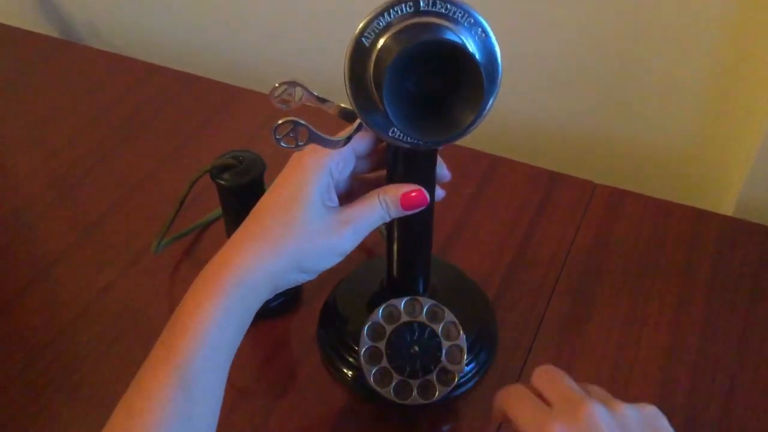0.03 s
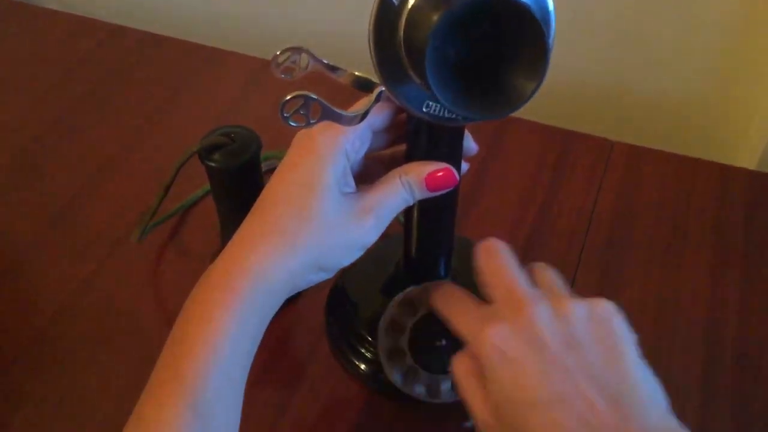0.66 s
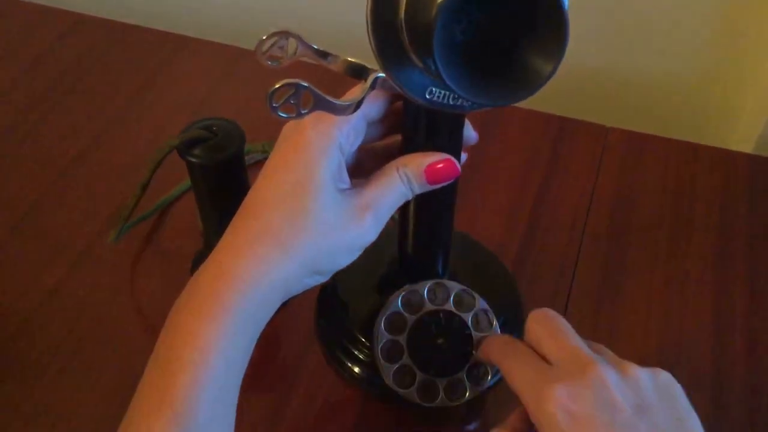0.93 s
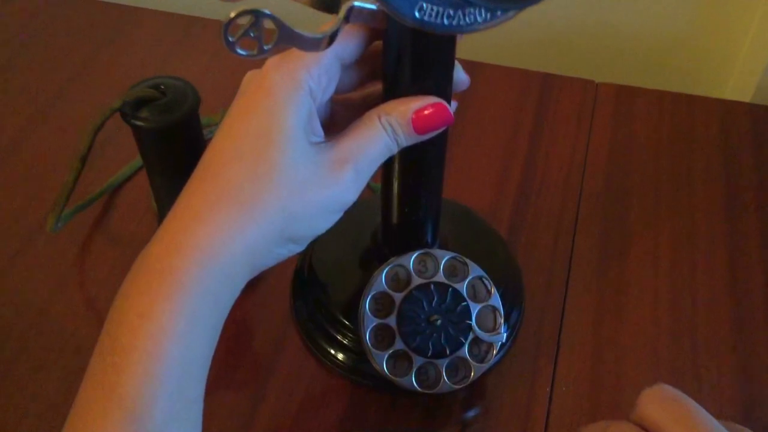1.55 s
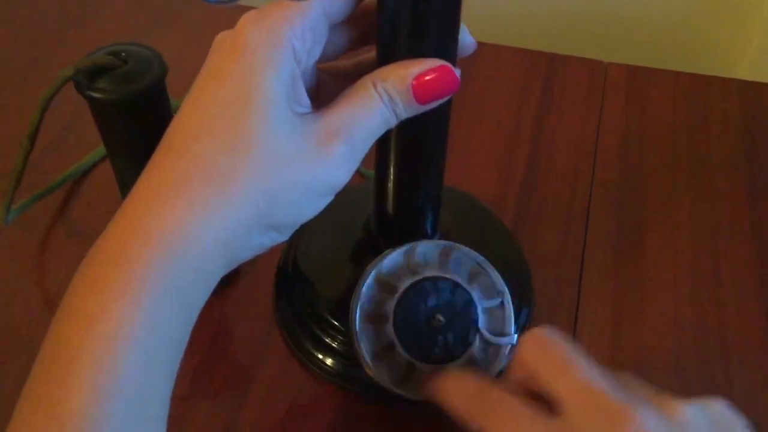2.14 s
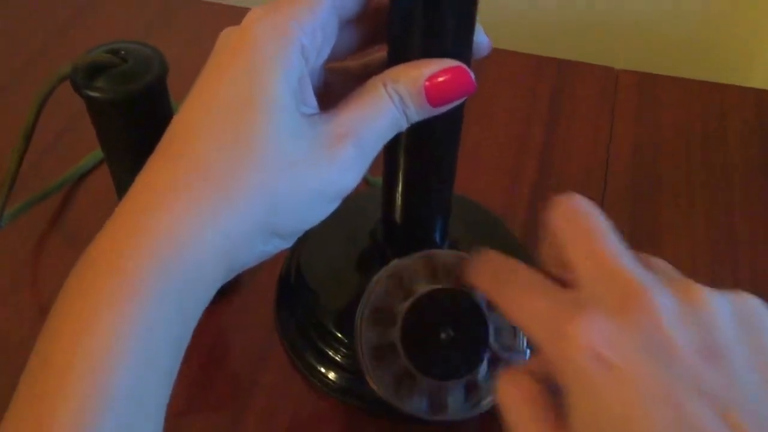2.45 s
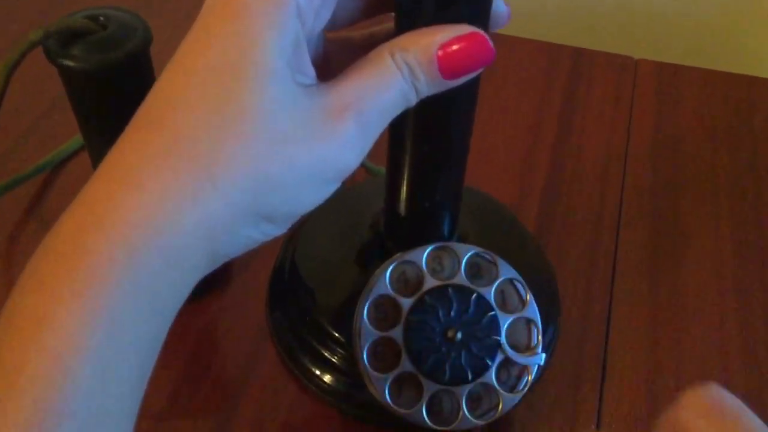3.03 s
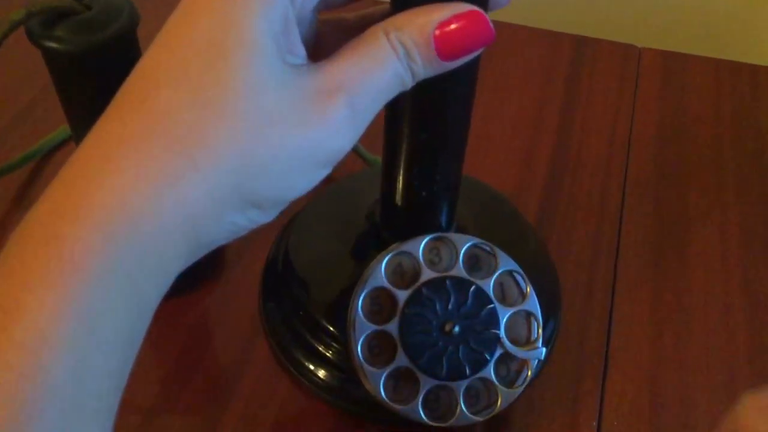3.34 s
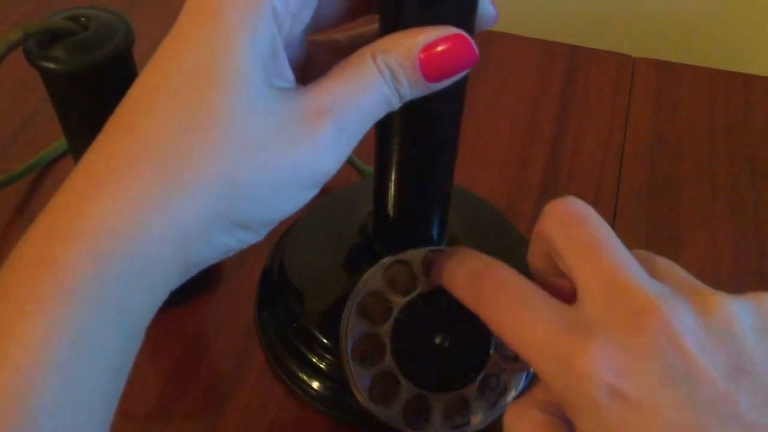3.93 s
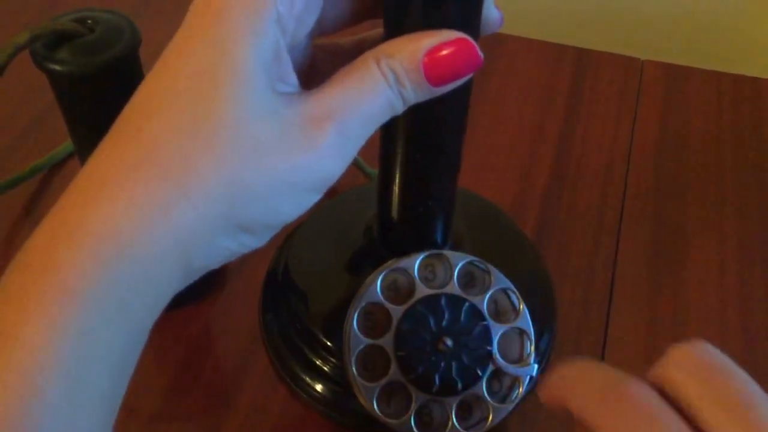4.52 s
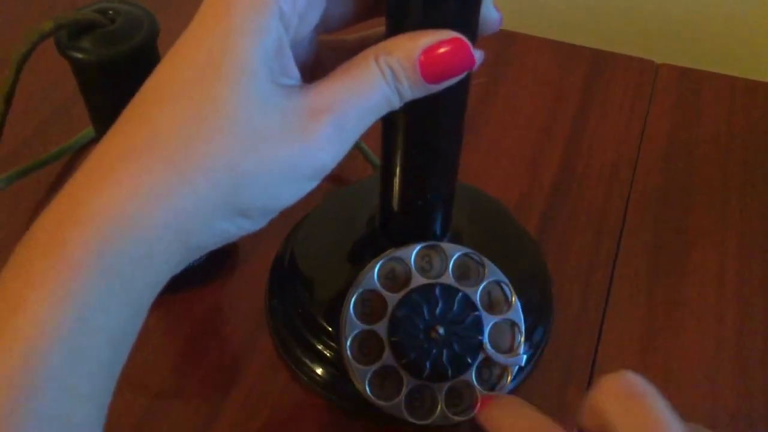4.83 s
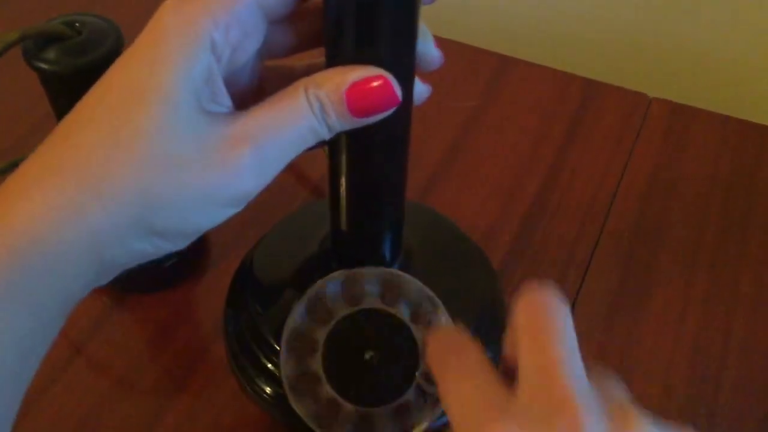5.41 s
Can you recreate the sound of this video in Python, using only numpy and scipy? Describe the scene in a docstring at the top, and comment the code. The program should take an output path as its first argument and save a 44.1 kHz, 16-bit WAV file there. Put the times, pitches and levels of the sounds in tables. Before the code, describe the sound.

A rotary telephone is dialled on a wooden table, heard close up in a small, live room. It opens with the tail of a metallic clunk and a brief, deep handling bump. From 0.5 seconds a finger winds the wheel almost silently, with faint nail ticks, and clicks on the metal stop at 0.9. The wheel whirs back with four even clicks and lands at 1.7 with a sharp clunk that rings the base. A second wind-up clicks at 2.7, and the wheel whirs home with five clicks, clunking at 3.6. The third meets the stop at about 4.3 and returns quickly, with two clicks and a clunk at 4.6. From 5 seconds a last quiet wind-up ends in a bright click at 5.6. A soft, low rumble swells now and then underneath, most between 3 and 5 seconds.

```python
"""A small, live room: a candlestick telephone is dialled on a wooden table, close to one microphone.
Four times a finger winds the wheel almost silently until it clicks on the metal stop. Three times the
wheel runs home under a whirring governor, clicking its pulse contacts, and lands with a clunk that
rings the base. The tail of an earlier landing and a handling bump on the recorder open the scene.
A soft, low rumble swells now and then underneath."""
import sys
import numpy as np
from scipy import signal
from scipy.fft import rfft, irfft, next_fast_len
from scipy.io import wavfile
from scipy.ndimage import map_coordinates

SR = 44100
rng = np.random.default_rng(int(sys.argv[2]) if len(sys.argv) > 2 else 0)


def store_wav(level_fs):
    """Save 16-bit WAV to argv[1]."""
    pcm = np.round(np.clip(np.atleast_2d(level_fs), -1, 1) * 32767)
    wavfile.write(sys.argv[1], SR, pcm.T.astype(np.int16))


N = 250047
TIME = np.arange(N) / SR
RING = np.arange(int(.7 * SR)) / SR  # time since a strike [s]


def amp(db):
    """Decibels to gain."""
    return 10 ** (np.asarray(db) / 20)

def unit(x):
    """Scaled to rms 1."""
    return x / np.sqrt(np.mean(x ** 2) + 1e-20)

def along(points, hz):
    """(frequency, value) points read on a log frequency axis."""
    freqs, values = np.transpose(points)
    return np.interp(np.log(hz + 1), np.log(freqs), values)

def wobble(rate):
    """A smooth random curve, rate knots a second."""
    return map_coordinates(rng.standard_normal(int(N * rate / SR) + 4), [TIME * rate])

def fade(t, t60):
    """Exponential decay, 60 dB in t60 seconds."""
    return np.exp(-np.log(1000) * t / t60)

def ramp(start, length):
    """Rises from 0 to 1 over length seconds."""
    return np.clip((TIME - start) / length, 0, 1)

def held(start, end, attack, release):
    """Attack from start, hold until end, release."""
    return ramp(start, attack) * (1 - ramp(end, release))

def add(track, s, sound):
    """Mix a sound into the track from time s on."""
    start = round(s * SR)
    part = sound[max(-start, 0):N - start]
    track[max(start, 0):][:len(part)] += part

def coloured(x, tone):
    """Causal filter with the given spectrum; white noise keeps its power."""
    size = 2 * next_fast_len(len(x) // 2 + 2048)
    gain = unit(amp(along(tone, np.fft.rfftfreq(size, 1 / SR))))
    cepstrum = irfft(np.log(gain + 1e-6))[:size // 2]
    cepstrum[1:] *= 2  # minimum phase
    return irfft(rfft(x, size) * np.exp(rfft(cepstrum, size)))[:len(x)]

def steady_noise(tone):
    """Noise of rms 1 with the given spectrum."""
    return unit(coloured(rng.standard_normal(N), tone))

def dying_noise(decays):
    """A noise burst of energy 1 in which each frequency dies at its own speed."""
    hz, t, bands = signal.stft(rng.standard_normal(len(RING)), SR, nperseg=128)
    bands = bands * fade(t, along(decays, hz)[:, None])
    burst = signal.istft(bands, SR)[1][:len(RING)]
    return burst / np.linalg.norm(burst)

def resonant(x, modes):
    """What x stirs in a body with the given resonances."""
    size = next_fast_len(len(x) + SR // 8)
    f = np.fft.rfftfreq(size, 1 / SR)
    response = sum(amp(db) * 1j * f * width / (hz * hz - f * f + 1j * f * width)
                   for hz, width, db in modes)
    return irfft(rfft(x, size) * response, size)[:len(x)]

def struck(modes):
    """The ring of one tap; each tap shares its force a little differently among the resonances."""
    t = RING[:len(RING) // 2]
    ring = np.zeros(len(RING))
    for hz, width, db in modes:
        gain = amp(db + rng.normal()) * 2 * np.pi * width / SR
        ring[:len(t)] += gain * np.exp(-np.pi * width * t) * np.sin(2 * np.pi * (hz * t + rng.random()))
    return ring

# reverberation of the small room: (frequency [Hz], t60 [s])
ROOM_DECAY = [(150, 0.43), (500, 0.53), (2500, 0.36), (7000, 0.28), (15000, 0.24)]
def in_room(x, wet_db):
    """The direct sound at the microphone, and the room's answer building up just behind it."""
    tail = dying_noise(ROOM_DECAY) * (1 - fade(RING, 0.081))
    return x + amp(wet_db) * signal.fftconvolve(x, tail)[:len(x)]

# ring of the dial's small metal parts: (frequency [Hz], t60 [s])
METAL_DECAY = [(400, 0.071), (1200, 0.22), (4000, 0.042), (14000, 0.031)]
def blow(tone, crack_t60, rattle_db):
    """A hard contact: a short crack and the dense ring of the small parts."""
    envelope = fade(RING, crack_t60)
    crack = rng.standard_normal(len(RING)) * envelope
    rattle = amp(rattle_db) * dying_noise(METAL_DECAY)
    return np.linalg.norm(envelope) * coloured(crack / np.linalg.norm(crack) + rattle, tone)

# low modes of the base: (frequency [Hz], t60 [s], level on landing [dB], level at the stop [dB])
BASE_MODES = [(69, .5, -19, -31.5), (100.4, 0.4, -7.5, -13), (119.3, 0.38, -8, -2.5),
              (183.4, 0.81, -6, -15), (203, 0.1, -8.5, -2.5), (247.9, 0.27, -5, -10.5),
              (297.2, 0.2, -21.5, -11), (371.5, 0.25, -10, -16.5)]
def thud(landing, rise_s):
    """The base rocks on the table in its low modes."""
    rocking = np.zeros(len(RING))
    for hz, t60, landing_db, stop_db in BASE_MODES:
        gain = amp((landing_db if landing else stop_db) + rng.normal())
        rocking += gain * fade(RING, t60) * np.sin(2 * np.pi * (hz * RING + rng.random()))
    return rocking * (1 - fade(RING, rise_s))

# resonances of the metal base and wheel: (frequency [Hz], width [Hz], relative level [dB])
HOUSING_MODES = [(675, 32, 0), (732.3, 44, -5), (1003, 37, -5.5), (1176, 54, -4.5), (1277, 28, -5),
                 (1421, 42, -5.5), (1921, 66, -7), (2127, 71, -4), (2365, 120, -8), (2747, 45, -12),
                 (3494, 92, -4), (3850, 67, -15), (3974, 110, -10), (4510, 170, -7.5), (5170, 61, -4.5),
                 (5900, 30, -15), (6720, 120, -10.5), (8000, 31, -14.5)]
# spectrum of a landing: (frequency [Hz], relative level [dB])
LANDING_TONE = [(100, -3.5), (300, -8.5), (600, -7.5), (1000, -2.5), (1600, -6.5), (3000, -7), (3700, 2.5),
                (5200, 0.5), (8000, 0), (11000, -5.5), (13000, -1), (15500, -2)]
# the wheel reaches home: (time [s], relative strike level [dB], thud level [dB])
LANDINGS = [(-0.035, -10, -33.5), (1.6993, -3.5, -29.5), (3.5641, -3, -29), (4.5717, -3, -29.5)]
# the spring contacts snap over just before it lands: (time [s], relative level [dB])
SNAPS = [(1.6865, -24.5), (1.6928, -24.5), (1.6953, -13.5), (3.5536, -17), (3.5578, -14.5), (3.5615, -21),
         (4.562, -13.5), (4.567, -21.5)]
def wheel_landings():
    """The contacts snap over, then the wheel strikes home, bounces and shakes the whole telephone."""
    track = np.zeros(N)
    for s, db in SNAPS:
        snap = blow(LANDING_TONE, crack_t60=0.041, rattle_db=-10.5)
        add(track, s, amp(db - 2.5) * in_room(snap, wet_db=-10.5))
    for s, db, thud_db in LANDINGS:
        strike = blow(LANDING_TONE, crack_t60=0.016, rattle_db=-1.5) + amp(34.5) * struck(HOUSING_MODES)
        add(track, s, amp(db - 3.5) * in_room(strike, wet_db=-11.5))
        bounce = blow(LANDING_TONE, crack_t60=0.025, rattle_db=-3)
        add(track, s + 0.0088, amp(db - 19) * bounce)
        add(track, s, amp(thud_db) * thud(landing=True, rise_s=0.051))
    return track

# spectrum of the quiet room: (frequency [Hz], relative level [dB])
ROOM_TONE = [(20, -32), (60, -3.5), (150, -3), (340, -11.5), (450, -26), (700, -21.5), (1300, -24.5),
             (4000, -33.5), (10000, -41.5), (16000, -43.5)]
def room_tone():
    """Faint, low, steady air around the microphone."""
    return amp(-56.5) * steady_noise(ROOM_TONE)

# spectrum of the low rumble: (frequency [Hz], relative level [dB])
LOW_RUMBLE_TONE = [(18, -40.5), (27, -28.5), (40, -5), (55, -1), (70, 3), (88, -13.5), (120, -4.5),
                   (155, -24.5), (185, -14), (300, -27.5), (500, -43.5), (900, -89)]
# the rumble swells: (start [s], end [s], level [dB])
RUMBLE_SWELLS = [(0.428, 0.746, -52.5), (0.878, 1.04, -53), (1.697, 1.96, -52.5), (2.84, 4.833, -47),
                 (5.03, 5.67, -53)]
def low_rumble():
    """A faint, low rumble swells with handling, and once after the wheel lands."""
    floor = amp(-51.5)
    swells = sum(amp(db) * held(start, end, attack=0.1, release=0.06) for start, end, db in RUMBLE_SWELLS)
    return (floor + swells) * steady_noise(LOW_RUMBLE_TONE)

def handling_bump():
    """A brief, low handling bump on the recorder, in two deep tones."""
    swell = amp(-37) * held(0.085, 0.25, attack=0.061, release=0.22)
    lower = np.sin(2 * np.pi * 40 * TIME + .4 * wobble(13))
    upper = amp(-4.5) * np.sin(2 * np.pi * 73 * TIME)
    return swell * unit(lower + upper)

# spectrum of the rubbing fingertip: (frequency [Hz], relative level [dB])
FINGERTIP_TONE = [(200, 4), (700, 8.5), (1500, -0.5), (3500, -10), (5400, -12.5), (8000, -16.5),
                  (15500, -25.5)]
# the finger winds the wheel round: (start [s], end [s], relative level [dB])
WIND_UPS = [(0.464, 0.938, -74), (2.165, 2.681, -64.5), (3.797, 4.256, -62), (4.95, 5.587, -64.5)]
def finger_rub():
    """A fingertip rubs round with the wheel under uneven pressure, hardest as it squeezes onto the stop."""
    slide = sum(amp(db) * held(start, end, attack=0.016, release=0.02) for start, end, db in WIND_UPS)
    squeeze = sum(amp(scrape_db + 0.5) * held(s - 0.057, s, attack=0.025, release=0.11)
                  for s, _, _, scrape_db in STOP_HITS)
    pressure = amp(1.3 * wobble(60) + wobble(12))
    rub = (slide + squeeze) * pressure * steady_noise(FINGERTIP_TONE)
    return amp(-5.5) * in_room(rub, wet_db=-2.5)

# resonances of the finger wheel: (frequency [Hz], width [Hz], relative level [dB])
WHEEL_MODES = [(680, 120, 1.5), (3450, 96, 9.5), (3740, 200, -10), (4660, 180, -42), (7000, 220, -7)]
# spectrum of a nail's tick: (frequency [Hz], relative level [dB])
NAIL_TONE = [(200, -13), (700, 1.5), (1800, -2), (3300, 2.5), (5200, 6.5), (8000, -5.5), (15500, -11.5)]
# the nail touches the wheel: (time [s], relative level [dB], treble tilt [dB])
NAIL_TOUCHES = [(0.473, -51.5, -4), (0.517, -45, -5), (0.8912, -35, 4), (2.176, -38, -6.5),
                (2.232, -39, -6.5), (2.6463, -34, 23.5), (2.661, -26.5, 32), (3.990, -37.5, -11.5),
                (3.998, -41.5, -22.5), (4.070, -42.5, -6.5), (4.197, -38.5, 4.5), (4.220, -45.5, 7),
                (5.102, -44, 10), (5.180, -39.5, -6), (5.364, -37.5, 24), (5.547, -37.5, 15)]
def nail_ticks():
    """The nail ticks in the finger holes; the brighter the tick, the less the wheel rings."""
    track = np.zeros(N)
    for s, db, tilt_db in NAIL_TOUCHES:
        tone = [(hz, level + tilt_db * min(hz / 12000, 1)) for hz, level in NAIL_TONE]
        tick = blow(tone, crack_t60=0.021, rattle_db=2.5)
        ring = amp(22 - 0.72 * tilt_db) * struck(WHEEL_MODES)
        add(track, s, amp(db - 7.5) * in_room(tick + ring, wet_db=-12))
    return track

# spectrum of the stop's click: (frequency [Hz], relative level [dB])
STOP_CLICK_TONE = [(150, -23), (700, -9), (1500, -21.5), (2300, -14), (4000, -13), (6000, -7), (8000, -13),
                   (11500, -6.5), (14300, 2.5), (16000, -2)]
# spectrum of the nail's scrape: (frequency [Hz], relative level [dB])
NAIL_SCRAPE_TONE = [(500, -21), (2500, 2), (4200, -8), (5250, 3), (6500, -5), (8500, -10.5), (12000, -21),
                    (15500, -7)]
# the finger meets the stop: (time [s], relative click level [dB], thud level [dB], scrape level [dB])
STOP_HITS = [(0.938, -20.5, -31.5, -52), (2.683, -16.5, -22, -48), (4.2535, -19, -25.5, -62.5),
             (5.587, -18.5, -36.5, -51.5)]
def finger_stops():
    """The nail scrapes onto the thin stop, which clicks brightly, with the finger's soft push behind."""
    track, scraping = np.zeros((2, N))
    for s, db, thud_db, scrape_db in STOP_HITS:
        click = blow(STOP_CLICK_TONE, crack_t60=0.024, rattle_db=5) + amp(22.5) * struck(HOUSING_MODES)
        add(track, s, amp(db) * in_room(click, wet_db=-12))
        add(track, s, amp(thud_db) * thud(landing=False, rise_s=0.12))
        scraping += amp(scrape_db) * ((TIME > s - .044) & (TIME < s))
    grain = amp(2.5 * wobble(250)) * rng.standard_normal(N)
    return track + coloured(scraping * grain, NAIL_SCRAPE_TONE)

def tooth_envelope(turns, load):
    """The worm's teeth knock twice a turn, strong and weak by turns, and harder under load."""
    half_turns = np.floor(2 * turns + .06 * wobble(200))
    at = np.flatnonzero(np.diff(half_turns) > 0)
    force_db = np.minimum(5.5 * rng.standard_normal(len(at)) + 6.5 * load[at], 10.5)
    strong_side_db = 7 * (np.arange(len(at)) % 2)
    knocks = np.zeros(N)
    knocks[at] = amp(force_db + strong_side_db)
    return unit(signal.fftconvolve(knocks, fade(RING, t60=0.01))[:N])

# resonances of the plate under gears and contacts: (frequency [Hz], width [Hz], relative level [dB])
PLATE_MODES = [(688, 40, 3), (1006, 40, -5), (1200, 49, -3.5), (1354, 23, -2), (1834, 91, -4),
               (2240, 170, -14), (2820, 77, -9), (3290, 35, -4), (4450, 150, -14), (5400, 120, -13.5)]
# spectrum of gear friction: (frequency [Hz], relative level [dB])
FRICTION_TONE = [(150, -11), (250, 4.5), (450, -3), (700, 3), (1600, 1), (3800, -1.5), (5000, -14.5),
                 (7000, -9), (11000, -22), (16000, -25)]
# spectrum of the teeth ticking: (frequency [Hz], relative level [dB])
GEAR_TICK_TONE = [(500, -21.5), (2000, -5.5), (4500, -5), (6000, -2.5), (8000, 1), (11500, -12.5),
                  (13500, -6), (16000, -6.5)]
# the wheel runs home: (let go [s], home [s], delay until the gears bite [s],
# relative whirr level [dB], relative tick level [dB])
RUNS_HOME = [(0.971, 1.706, 0.12, -43.5, -50.5), (2.78, 3.556, 0.13, -41, -46),
             (4.296, 4.57, 0.2, -42, -51)]
def governor():
    """The spinning governor hums through the base; its worm gear scrapes, buzzes and ticks."""
    start_hz, peak_hz, steady_hz = 92.6, 130.3, 121.4  # it speeds up, overshoots and is braked
    spin_up_s, settle_s, brake_s, bite_s = 0.32, 0.26, 0.12, 0.061
    free_db, braked_db = -47, -37.5  # it hums louder once its weights press on the cup
    hum, whirr_level, tick_level, buzz = np.zeros((4, N))
    for start, home, bite_after, gear_db, tooth_db in RUNS_HOME:
        running = held(start - .04, home, attack=0.052, release=0.015)
        braking_at = start + spin_up_s
        hz = start_hz + (peak_hz - start_hz) * ramp(start, spin_up_s)
        hz += (steady_hz - peak_hz) * ramp(braking_at, settle_s)
        turns = np.cumsum(hz * (1 + .008 * wobble(30))) / SR
        angle = 2 * np.pi * turns
        harmonics = np.sin(angle) + amp(-18) * np.sin(2 * angle) + amp(-23.5) * np.sin(3 * angle)
        hum_db = free_db + (braked_db - free_db) * ramp(braking_at, brake_s)
        hum += running * amp(hum_db + .8 * wobble(25)) * unit(harmonics)
        slack = 1 - ramp(start + bite_after - bite_s, bite_s)  # the gears are quieter until they bite
        load = wobble(45)  # the gear train loads and slackens unevenly
        whirr_db = gear_db - 7.5 * slack
        whirr_level += running * amp(whirr_db + 2.3 * load) * (1 + 0.091 * np.sin(angle))
        once_a_turn = np.diff(np.floor(turns), prepend=0)
        buzz += running * amp(whirr_db - 8.5) * unit(resonant(once_a_turn, PLATE_MODES))
        tick_level += running * amp(tooth_db - 24.5 * slack) * tooth_envelope(turns, load)
    friction = rng.standard_normal(N)
    whirr = unit(coloured(friction, FRICTION_TONE) + amp(17) * resonant(friction, PLATE_MODES))
    ticking = coloured(tick_level * rng.standard_normal(N), GEAR_TICK_TONE)
    return hum + amp(-2) * whirr_level * whirr + buzz + amp(-2.7) * in_room(ticking, wet_db=-12)

# spectrum of a contact's click: (frequency [Hz], relative level [dB])
CONTACT_TONE = [(200, -17), (700, -4.5), (2600, 0), (3800, 5), (5000, -0.5), (7500, -6.5), (11000, -10),
                (14500, -8), (16000, -10.5)]
# the cam opens the pulse contacts: (time [s], relative level [dB])
CONTACT_OPENINGS = [(1.1233, -23), (1.274, -26), (1.4318, -23.5), (1.5981, -24), (2.8251, -19.5),
                    (2.9848, -20.5), (3.1356, -19), (3.2931, -20.5), (3.4607, -19), (4.372, -21),
                    (4.5472, -15.5)]
def pulse_contacts():
    """The leaves click open; mid-run they also click softly as the cam picks them up and as they close."""
    lead_s, close_s = 0.071, 0.06
    pickups = [(s - lead_s, db - 9) for s, db in CONTACT_OPENINGS]
    closings = [(s + close_s, db - 8.5) for s, db in CONTACT_OPENINGS]
    soft_clicks = [(s, db) for s, db in pickups + closings
                   if any(start + lead_s < s < home for start, home, *_ in RUNS_HOME)]
    onset = 1 - fade(RING, 0.017)  # the leaves slide before they part
    track = np.zeros(N)
    for s, db in list(CONTACT_OPENINGS) + soft_clicks:
        wipe = onset * blow(CONTACT_TONE, crack_t60=0.018, rattle_db=-16)
        click = wipe + amp(13) * resonant(wipe, PLATE_MODES)
        add(track, s, amp(db - 2.5) * in_room(click, wet_db=-17))
    return track

def scene():
    """The dial close by, over low rumble and the quiet of the room, in mono."""
    mix = wheel_landings() + room_tone() + low_rumble() + handling_bump() + finger_rub()
    mix += nail_ticks() + finger_stops() + governor() + pulse_contacts()
    return mix[None]

def record(dry):
    """The microphone's chain rounds off the loudest peaks at full scale and cuts the highest treble."""
    top_hz = 15900
    rounded = dry / (1 + np.abs(dry) ** 6) ** (1 / 6)
    size = next_fast_len(N + SR // 4)
    lowpass = 1 / (1 + (np.fft.rfftfreq(size, 1 / SR) / top_hz) ** 120)
    return irfft(rfft(rounded, size) * lowpass, size)[:, :N]

dry = scene()
out = record(dry)
store_wav(out)
```